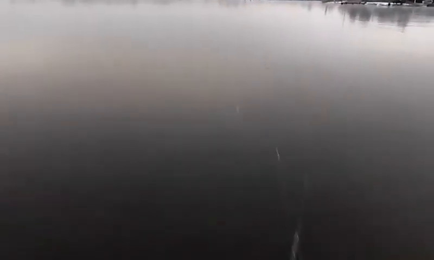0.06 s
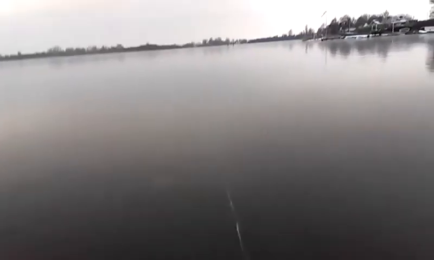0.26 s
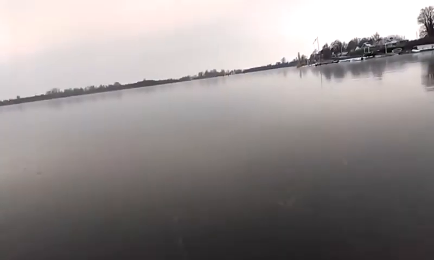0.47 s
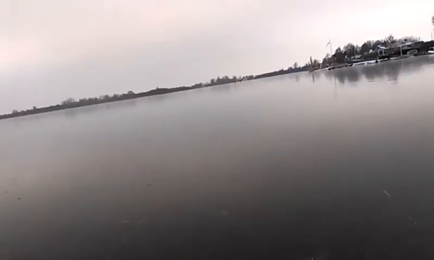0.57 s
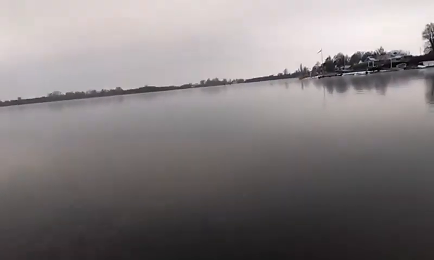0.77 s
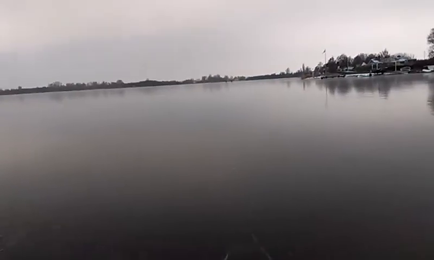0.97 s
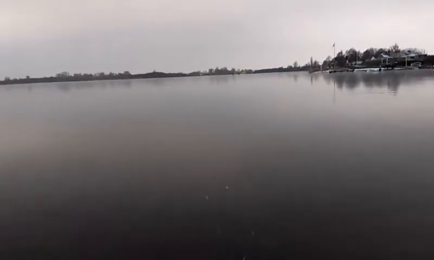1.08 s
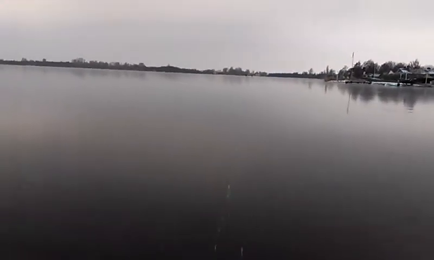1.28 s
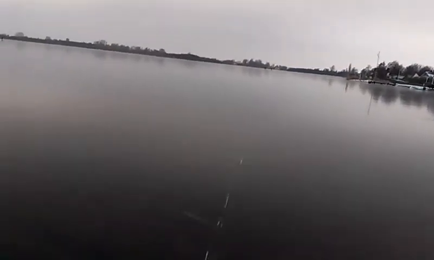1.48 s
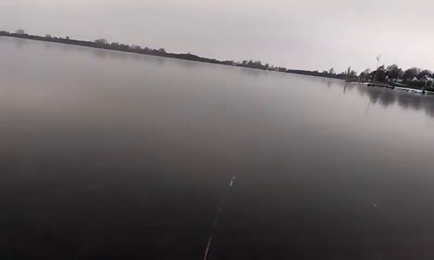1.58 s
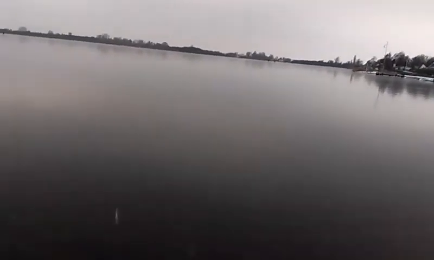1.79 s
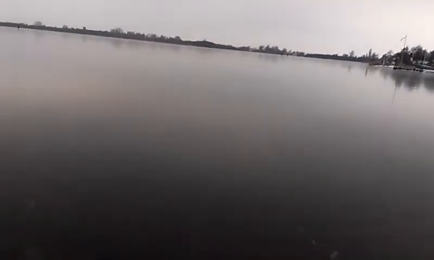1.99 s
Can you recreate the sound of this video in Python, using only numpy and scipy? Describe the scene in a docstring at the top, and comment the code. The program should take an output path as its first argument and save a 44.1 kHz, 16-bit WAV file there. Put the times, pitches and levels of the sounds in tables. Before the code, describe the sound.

Dozens of brittle clicks and cracks, some with a brief metallic clink, run throughout; faint gritty blade hiss grows later, over deep wind rumble and puffs striking a carried microphone outdoors, with almost no echo.

```python
"""Short dry cracks snap in thin lake ice, close under skates, heard from a camera that the skater carries.
Each crack is a snap and crumbling noise in three resonances; it rings the steel blades and scatters in the ice.
The blades hiss as they slide: shaped noise with ticks of grit and short scrapes.
The headwind is shaped noise: a deep drone, a swelling rumble, a flutter and brief puffs on the microphone."""
import sys
import numpy as np
from scipy import signal
from scipy.fft import rfft, irfft, next_fast_len
from scipy.io import wavfile
from scipy.ndimage import uniform_filter1d, minimum_filter1d, map_coordinates

SR = 44100
rng = np.random.default_rng(int(sys.argv[2]) if len(sys.argv) > 2 else 0)


def master_out(mix):
    """Clip the mix to full scale and print it as 16-bit PCM to the path in sys.argv[1]."""
    frames = np.transpose(np.atleast_2d(mix))
    ceiling = np.clip(frames, -1, 1)
    pcm = np.round(ceiling * 32767).astype(np.int16)
    wavfile.write(sys.argv[1], SR, pcm)


N = 89478


def amp(db):
    """Decibels to gain."""
    return 10 ** (np.asarray(db) / 20)


def unit(x):
    """Scaled to rms 1."""
    return x / np.sqrt(np.mean(x ** 2) + 1e-20)


def noise(length=N):
    """White noise, length in samples."""
    return rng.standard_normal(length)


def seconds(length):
    """Time [s] of each of length samples."""
    return np.arange(length) / SR


def curve(rows):
    """One value per sample from (time [s], value) rows."""
    return np.interp(seconds(N), *np.transpose(rows))


def wobble(rate):
    """A smooth random curve, rate knots a second."""
    return map_coordinates(noise(4000), [np.arange(N) * rate / SR], mode="wrap")


def colour(x, points):
    """x shaped by (frequency [Hz], level [dB]) points, at rms 1."""
    m = next_fast_len(N + 8192)
    hz, db = np.transpose(points)
    log_hz = np.log(np.fft.rfftfreq(m, 1 / SR) + 1)
    gain = amp(np.interp(log_hz, np.log(hz + 1), db))
    return unit(irfft(rfft(x, m) * gain, m)[:N])


def band(x, edges, order):
    """Causal band-pass between two edges [Hz]."""
    edges = np.clip(edges, 20, SR / 2 - 100)
    return signal.sosfilt(signal.butter(order, edges, "bandpass", fs=SR, output="sos"), x)


def add(track, s, x):
    """Mix x into the track at s seconds."""
    i = max(0, round(s * SR))
    track[i:i + len(x)] += x[:max(0, N - i)]


def limit(x, ceiling_db=-13, hold_s=0.0024):
    """A quick limiter turns peaks down towards the ceiling with a smoothed gain."""
    size = max(3, int(hold_s * SR))
    need = np.minimum(1, amp(ceiling_db) / (np.abs(x) + 1e-9))
    held = minimum_filter1d(need, size)
    return x * uniform_filter1d(uniform_filter1d(held, size), size // 2)


def puffs():
    """Wind on the microphone, from deep buffets to short blips: windowed bursts of band-passed noise."""
    # single puffs: (centre [s], length [s], upper edge [Hz], level [dB])
    puff_rows = [(0.028, 0.011, 675, -31), (0.067, 0.0082, 1020, -29), (0.085, .04, 200, -25.5),
                 (0.116, 0.00876, 1070, -15), (0.133, 0.0066, 990, -22), (0.148, 0.01066, 1150, -21),
                 (0.174, 0.0075, 820, -31.5), (0.236, 0.016, 330, -25), (0.262, 0.008, 970, -33.5),
                 (0.274, 0.039, 147, -24.5), (0.279, 0.0067, 1250, -36), (0.635, 0.0122, 610, -26),
                 (0.738, 0.024, 574, -27), (1.035, .022, 610, -28), (1.07, .04, 160, -27.5),
                 (1.265, 0.0094, 1400, -32), (1.312, 0.059, 150, -24.5), (1.402, 0.0051, 1070, -23),
                 (1.433, 0.0078, 1240, -27), (1.464, 0.0092, 1040, -27), (1.526, .008, 800, -34),
                 (1.55, .08, 174, -19.5), (1.666, 0.0082, 990, -30), (1.68, 0.014, 1090, -21),
                 (1.714, 0.0066, 940, -27), (1.726, 0.01, 1170, -28.5), (1.782, 0.0055, 1420, -25),
                 (1.822, 0.044, 142, -21), (1.847, 0.014, 1090, -22), (1.861, 0.011, 840, -23.5),
                 (1.93, .012, 1160, -34), (1.984, 0.015, 940, -29), (2.001, 0.044, 156, -18.5),
                 (2.003, 0.00695, 1220, -14), (2.026, 0.0067, 1080, -21)]
    edge_ratio = 2.57  # upper edge over lower edge
    skirt_db = -17.5  # the octave above the upper edge, against the body
    out = np.zeros(N)
    for s, length, hz, db in puff_rows:
        size = int(length * SR)
        # the end of a longer noise, where the filter has settled
        body = unit(band(noise(SR // 4), (hz / edge_ratio, hz), order=4)[-size:])
        skirt = unit(band(noise(SR // 4), (hz, 2 * hz), order=4)[-size:])
        puff = (body + amp(skirt_db) * skirt) * signal.windows.tukey(size, .6)
        add(out, s - length / 2, amp(db) * unit(puff))
    return out


def wind():
    """Over a deep drone, eddies swell the rumble and, more strongly, the flutter; puffs join before the limiter."""
    # spectra of the deep drone, the rumble and the flutter above it: (frequency [Hz], relative level [dB])
    drone_spectrum = [(15, -9), (25, -15), (50, 9), (75, 1.5), (100, 7), (150, -32), (400, -70.5),
                      (2000, -120)]
    rumble_spectrum = [(30, -38), (60, -15.5), (90, -1.5), (125, 0), (160, -3), (220, -2.5), (320, -8),
                       (500, -13.5), (700, -21), (1000, -32.5), (1600, -41), (3000, -53), (10000, -110)]
    flutter_spectrum = [(130, -20), (270, 3.5), (450, 1), (750, -6), (1000, -7.5), (1300, -14.5),
                        (2000, -25), (4000, -37.5), (12000, -100)]
    # rise and fall of the rumble and of the flutter, before their trims: (time [s], level [dB])
    rumble_level = [(0, -26), (.08, -21), (.15, -23), (.2, -32.5), (.26, -23), (.31, -28.5), (.39, -29),
                    (.47, -23.5), (.54, -28.5), (.61, -25), (.8, -26.5), (.92, -19), (1.0, -25.5),
                    (1.14, -24), (1.3, -22), (1.42, -20), (1.6, -19), (1.65, -25.5), (1.7, -19),
                    (1.85, -21), (1.89, -23.5), (1.93, -20), (2.03, -21)]
    flutter_level = [(0, -27.5), (.07, -22.5), (.095, -34), (.14, -41), (.2, -42), (.36, -41), (.45, -33.5),
                     (.65, -33), (1.0, -29.5), (1.2, -31), (1.33, -28), (1.45, -24.5), (1.58, -23.5),
                     (1.64, -26), (1.7, -21.5), (1.85, -33), (1.89, -39), (1.93, -25), (1.96, -30),
                     (2.03, -27)]
    drone_db, rumble_trim_db, flutter_trim_db = -30, 0.5, -2
    rumble_lumps_db, flutter_lumps_db = 2.5, 3.5  # depth of the eddies
    eddies = wobble(150)
    rumble = unit(colour(noise(), rumble_spectrum) * amp(rumble_lumps_db * eddies))
    flutter = unit(colour(noise(), flutter_spectrum) * amp(flutter_lumps_db * eddies))
    air = amp(drone_db) * colour(noise(), drone_spectrum)
    air += rumble * amp(curve(rumble_level) + rumble_trim_db)
    air += flutter * amp(curve(flutter_level) + flutter_trim_db)
    return limit(air + puffs())


def ring(x):
    """The steel blade's answer to x: decaying sine modes convolved with it, at the level of x."""
    # long ring of the blade: (frequency [Hz], relative level [dB], time to fall 60 dB [s])
    blade_modes = [(2570, -10, .1), (3200, -11, .06), (5755, -2, .16), (6244, -1, .18), (6900, -5, .07),
                   (7295, 1, .2), (7730, 1, .2), (9500, -15, .12)]
    t = seconds(SR // 4)
    tail = np.zeros(len(t))
    for hz, db, t60 in blade_modes:
        tail += amp(db - 60 * t / t60) * np.sin(2 * np.pi * (hz * t + rng.random()))
    return unit(signal.fftconvolve(x, tail)[:N]) * np.std(x)


def glide():
    """The blades hiss, tick over grit and scrape where an edge bites, and the sliding rings the steel."""
    # the sliding blades, before the trims of hiss and grit: (time [s], level [dB])
    glide_level = [(0.0, -45.5), (0.3, -47.5), (0.41, -47.5), (0.46, -38.5), (0.65, -42.5), (0.77, -46.5),
                   (1.16, -45), (1.25, -46.5), (1.3, -49.5), (1.38, -41), (1.5, -44.5), (1.55, -34.5),
                   (1.66, -38), (1.7, -41), (1.78, -36), (1.84, -39), (1.92, -42), (2.03, -39.5)]
    # spectrum of hiss, grit and scrapes: (frequency [Hz], relative level [dB])
    hiss_spectrum = [(900, -10), (1500, -7), (2000, -7.5), (2600, -5.5), (3200, -9), (4000, -7),
                     (4800, -7.5), (6000, 1), (7000, -1.5), (7900, 0.5), (8700, -11.5), (9700, -10.5),
                     (10500, -33), (13000, -37), (16000, -75)]
    # short scrapes of an edge, before their unevenness: (start [s], length [s], level [dB])
    scrape_rows = [(0.437, 0.027, -31), (0.478, 0.073, -37.5), (0.582, 0.072, -36.5), (1.395, 0.016, -33),
                   (1.639, 0.033, -33), (1.794, 0.018, -37)]
    hiss_db, grit_db, ring_db = -1, -6.5, -20
    swell_db, chatter_db, scrape_chatter_db = 3.5, 3, 2.9  # slow and fast unevenness
    grit_per_s, grit_spread_db = 200, 0.5

    uneven_db = swell_db * wobble(44.27) + chatter_db * wobble(500)
    hiss = colour(noise(), hiss_spectrum) * amp(hiss_db + uneven_db)
    ticks = rng.random(N) < grit_per_s / SR
    grit = colour(ticks * amp(grit_spread_db * np.clip(noise(), -2, 2)), hiss_spectrum)
    bite = np.zeros(N)
    for s, length, db in scrape_rows:
        add(bite, s, amp(db) * signal.windows.tukey(int(length * SR), .4))
    scrape = colour(noise(), hiss_spectrum) * bite * amp(scrape_chatter_db * wobble(400))
    slide = amp(curve(glide_level)) * (hiss + amp(grit_db) * grit) + scrape
    return slide + amp(ring_db) * ring(slide)


def wash(x):
    """A crack scatters briefly through the ice sheet: convolution with a decaying noise tail."""
    t60 = 0.033  # s
    t = seconds(SR // 4)
    tail = noise(len(t)) * amp(-60 * t / t60)
    return signal.fftconvolve(x, tail / np.linalg.norm(tail))[:N]


def pings():
    """The biggest cracks set the ice sheet ringing: decaying sine modes."""
    # strokes on the sheet: (time [s], level [dB])
    ping_rows = [(.7085, -25), (1.796, -35)]
    # modes of the sheet: (frequency [Hz], level against the stroke [dB], time to fall 60 dB [s])
    sheet_modes = [(1690, -1, .05), (1920, 8, .016), (2213, -3, .08), (2912, -13, .07), (3262, -11, .05),
                   (3780, 6, .016), (5588, -3, .05)]
    out, t = np.zeros(N), seconds(SR // 6)
    for s, level in ping_rows:
        for hz, db, t60 in sheet_modes:
            add(out, s, amp(level + db - 60 * t / t60) * np.sin(2 * np.pi * hz * t))
    return out


def clinks():
    """The hardest cracks make one tone of the blade sing out: a decaying sine."""
    # single blade tones: (time [s], frequency [Hz], starting level [dB], time to fall 60 dB [s])
    clink_rows = [(.4445, 7690, -21.5, 0.086), (.7095, 5590, -23, 0.069), (1.081, 7780, -16, 0.024),
                  (1.797, 7250, -17.5, 0.063)]
    out, t = np.zeros(N), seconds(SR // 6)
    for s, hz, db, t60 in clink_rows:
        add(out, s, amp(db - 60 * t / t60) * np.sin(2 * np.pi * hz * t))
    return out


def spits():
    """The most brittle cracks throw off a bright spit: a decaying burst of top-treble noise."""
    # bright bursts: (time [s], starting level [dB], time to fall 60 dB [s])
    spit_rows = [(0.592, -27, 0.0097), (.607, -26.5, 0.007), (0.7095, -24, 0.011), (1.0785, -41, .01),
                 (1.402, -40, 0.11), (1.797, -31, 0.088)]
    out, t = np.zeros(N), seconds(SR // 20)
    for s, db, t60 in spit_rows:
        burst = unit(band(noise(len(t)), (8500, 13000), order=2))
        add(out, s, amp(db - 60 * t / t60) * burst)
    return out


def crack_force(t, t60):
    """The ice gives way: one sharp snap, then ragged crumbling noise that dies off."""
    ragged_db, ragged_hz, rise_s, snap = 2.5, 970, 0.00026, 5.4
    ragged = map_coordinates(noise(200), [t * ragged_hz], mode="wrap")
    crumbling = unit(noise(len(t)) * amp(ragged_db * ragged))
    force = crumbling * amp(-60 * t / t60) * (1 - np.exp(-t / rise_s))
    force[0] += snap
    return force


def cracks():
    """Each crack's force rings three resonances of the skate's body, with a dull knock below and splinters
    above."""
    # cracks in the ice: (time [s], low, middle and high band level before trim [dB],
    # time for the crumbling to fall 60 dB [s], middle resonance [Hz], high resonance [Hz])
    crack_rows = [(0.0068, -32, -25.5, -20.5, 0.012, 2500, 5070),
                  (0.0573, -30.5, -35, -24.5, 0.014, 3500, 5550),
                  (0.084, -24.5, -23, -20.5, 0.0082, 2300, 4800), (0.124, -29, -42, -33, 0.034, 3430, 7200),
                  (0.1655, -46, -39.5, -37, 0.015, 2630, 5450),
                  (0.1971, -25.5, -29.5, -22.5, 0.018, 2150, 5960),
                  (0.2623, -58, -46, -45, 0.012, 2900, 6000),
                  (0.4446, -23, -23.5, -18.5, 0.0084, 2700, 6760),
                  (0.5125, -26, -29.5, -25.5, 0.016, 2630, 6180),
                  (0.5904, -35, -38, -18.5, 0.012, 3980, 6900),
                  (0.598, -21.5, -22.5, -22, 0.0081, 2480, 5500),
                  (0.6068, -39, -34, -34, 0.0026, 3430, 5900),
                  (0.6142, -28.5, -27, -24.5, 0.0056, 4030, 4800),
                  (0.6622, -33.5, -32, -27.5, 0.0061, 3000, 7000),
                  (0.7075, -24, -22.5, -20.5, 0.013, 3730, 6000),
                  (0.7325, -40, -33.5, -29, 0.023, 2650, 7300),
                  (0.7915, -38, -29.5, -28.5, 0.0099, 2500, 6600),
                  (0.806, -52, -38, -35.5, 0.013, 2580, 7500), (0.8436, -25, -23, -21.5, 0.011, 2720, 6600),
                  (0.895, -38, -37.5, -28, 0.015, 3370, 6200), (0.9272, -33, -41, -32, 0.069, 3040, 7770),
                  (0.9512, -24, -26, -24, 0.011, 2540, 6100), (0.9612, -31, -22.5, -20, 0.016, 2940, 6600),
                  (0.9975, -52, -40.5, -30, 0.041, 2740, 7100),
                  (1.0612, -42, -29, -26.5, 0.015, 2500, 6150),
                  (1.0801, -29, -28, -20.5, 0.015, 2530, 5450), (1.115, -43, -39, -33.5, 0.03, 2600, 6500),
                  (1.1797, -58, -51, -29.5, 0.059, 2610, 7500),
                  (1.1868, -31.5, -35, -32.5, 0.0061, 2600, 6480),
                  (1.2109, -58, -41, -35, 0.055, 2670, 6220), (1.2264, -55, -37, -26, 0.058, 2600, 6500),
                  (1.3388, -34, -40, -31.5, 0.019, 3020, 7540),
                  (1.3544, -29, -34.5, -37.5, 0.018, 2700, 5320), (1.378, -29, -38, -36, 0.037, 3200, 6090),
                  (1.403, -41, -55, -21.5, 0.064, 3940, 6400), (1.4126, -32, -46, -22, 0.018, 2450, 7760),
                  (1.4398, -37, -36, -31, 0.063, 3070, 7200), (1.459, -30, -35, -34.5, 0.026, 2430, 5730),
                  (1.529, -32.5, -34.5, -30, 0.014, 2830, 6960),
                  (1.5398, -55, -37, -26.5, 0.036, 2700, 7300),
                  (1.6313, -51, -29.5, -30, 0.077, 2660, 6900),
                  (1.7159, -27, -35, -27.5, 0.036, 2480, 8150), (1.722, -43, -32, -37, 0.012, 2610, 7200),
                  (1.748, -29, -34, -32, 0.0084, 2500, 6540), (1.7686, -37, -38, -34, 0.012, 2580, 8100),
                  (1.7952, -13, -26, -23, 0.0064, 3130, 5800),
                  (1.7967, -31, -23.5, -21.5, 0.032, 2280, 7280),
                  (1.8093, -22.5, -32, -26.5, 0.0077, 2450, 6200),
                  (1.829, -44, -35, -32, 0.022, 2580, 5490), (1.926, -33, -32.5, -36, 0.011, 2600, 7100),
                  (1.944, -51, -30, -35, 0.0063, 2550, 6100), (1.9534, -26, -37, -31, 0.0096, 2780, 7650),
                  (1.998, -45, -40, -37.5, 0.018, 2980, 7400), (2.0084, -32, -33, -29.5, 0.012, 2600, 5370)]
    # low, middle and high band: (lower edge [Hz], upper edge [Hz])
    band_edges = [(1350, 2050), (2250, 4300), (5000, 8200)]
    # one value a band: trim [dB], then resonance width [Hz]
    trims_db = [-3.5, -1, 0.5]
    widths_hz = [500, 370, 1830]
    low_hz = 1450  # the lowest resonance
    knock_db = -8.5  # against the tabled low band
    splinter_db, splinter_grows = -41, 0.91  # level at a tabled high band of -15.5 dB; dB per dB of it
    level_span_s = 0.0037  # a part has the energy of its level held this long
    out, t = np.zeros(N), seconds(SR // 16)
    for s, low_db, mid_db, high_db, t60, mid_hz, high_hz in crack_rows:
        force = crack_force(t, t60)
        knock = band(force, (650, 1400), order=2)
        splinters = band(force, (8200, 12000), order=2)
        parts = [(knock, low_db + knock_db),
                 (splinters, splinter_db + splinter_grows * (high_db + 15.5))]
        resonances, levels = (low_hz, mid_hz, high_hz), (low_db, mid_db, high_db)
        for hz, width, edges, db, trim in zip(resonances, widths_hz, band_edges, levels, trims_db):
            resonant = signal.lfilter(*signal.iirpeak(hz, hz / width, SR), force)
            parts.append((band(resonant, edges, order=3), db + trim))
        for part, db in parts:
            add(out, s, amp(db) * part * np.sqrt(level_span_s * SR) / np.linalg.norm(part))
    return out


def scene():
    """The headwind, the glide and the cracks with all that they set ringing."""
    ring_db, wash_db = -22, -13  # against the cracks
    ice = cracks()
    answer = amp(ring_db) * ring(ice) + amp(wash_db) * wash(ice)
    return (wind() + glide() + pings() + clinks() + spits() + answer + ice)[None]


def record(dry):
    """The camera keeps nothing above its band limit."""
    top_hz = 16300
    m = next_fast_len(N + 8192)
    kept = np.fft.rfftfreq(m, 1 / SR) < top_hz
    return irfft(rfft(dry, m) * kept, m)[:, :N]


dry = scene()
out = record(dry)
master_out(out)
```